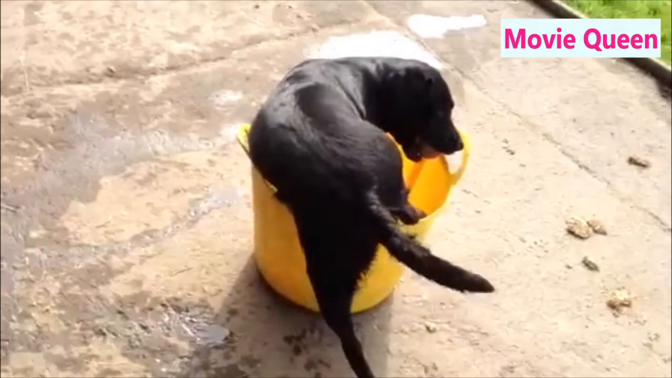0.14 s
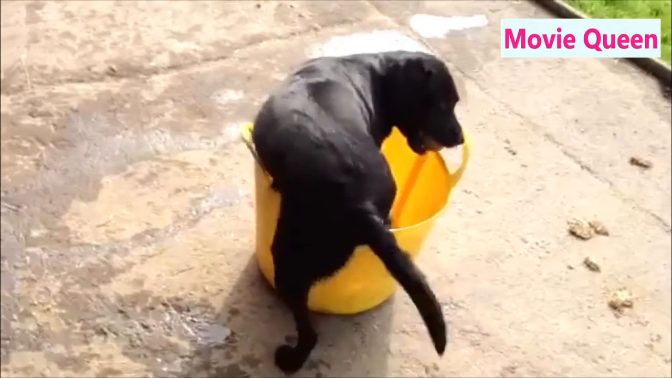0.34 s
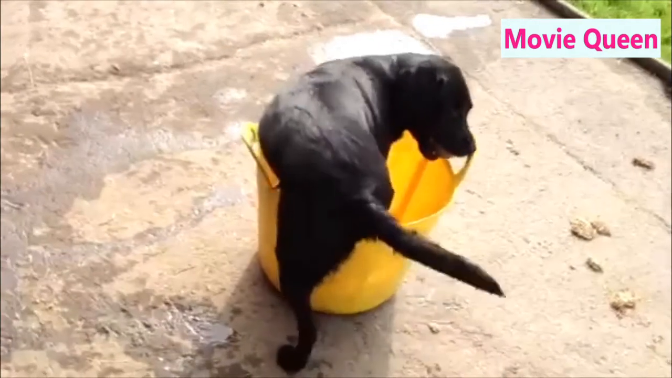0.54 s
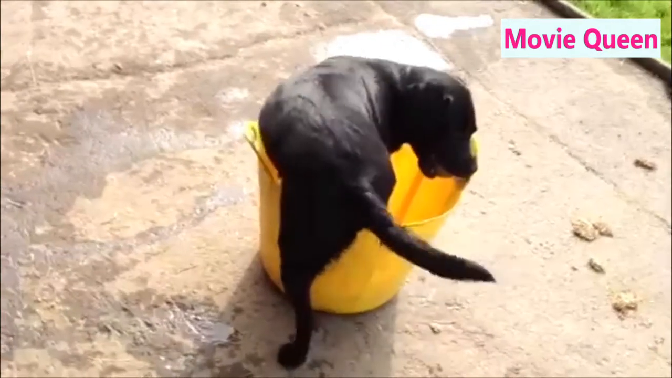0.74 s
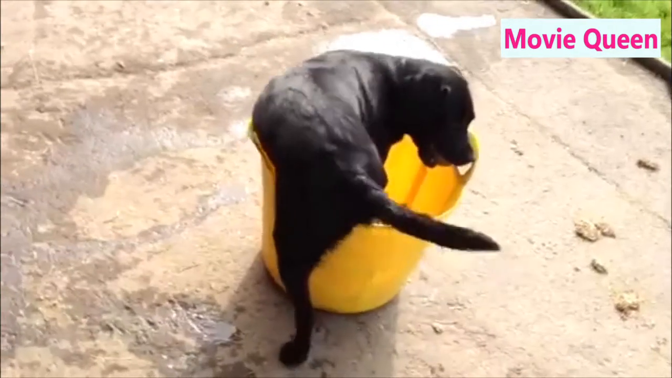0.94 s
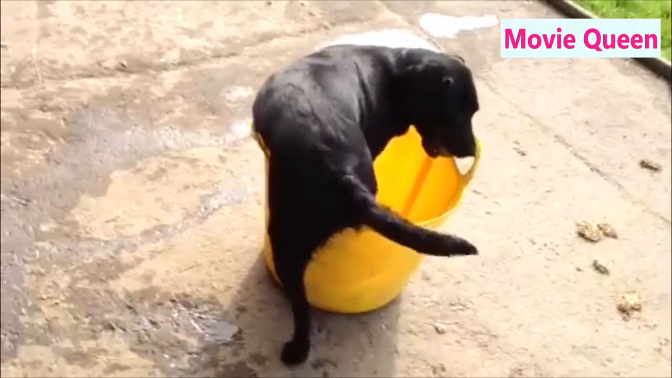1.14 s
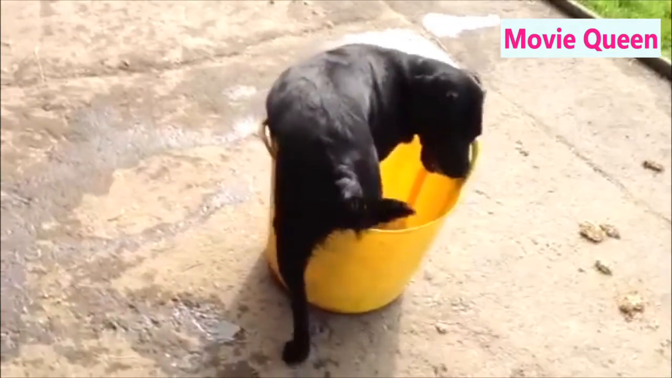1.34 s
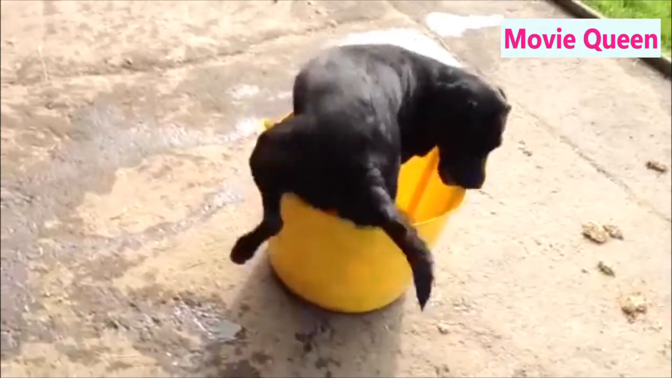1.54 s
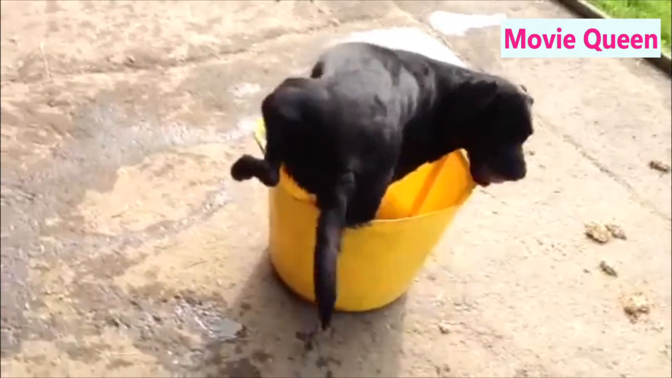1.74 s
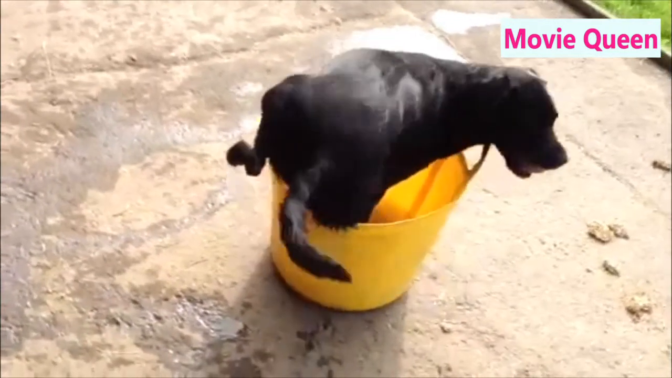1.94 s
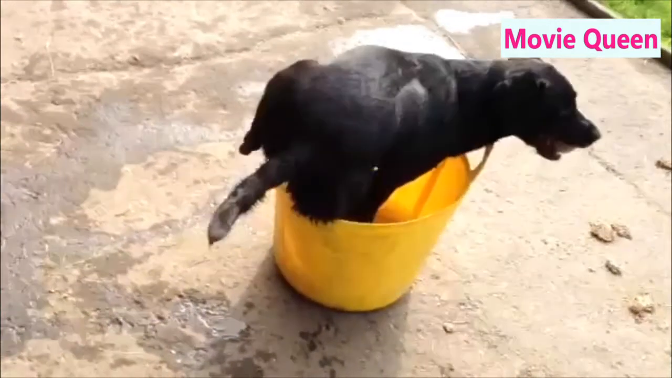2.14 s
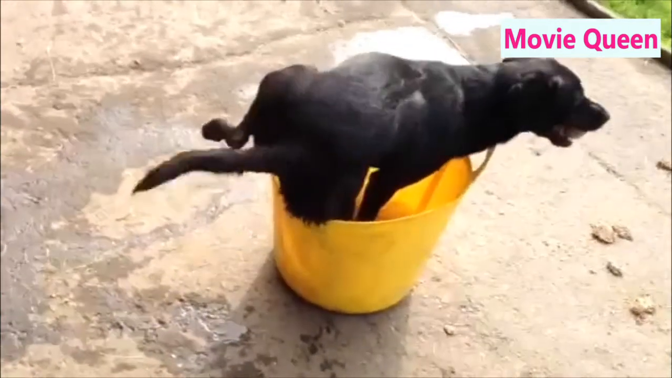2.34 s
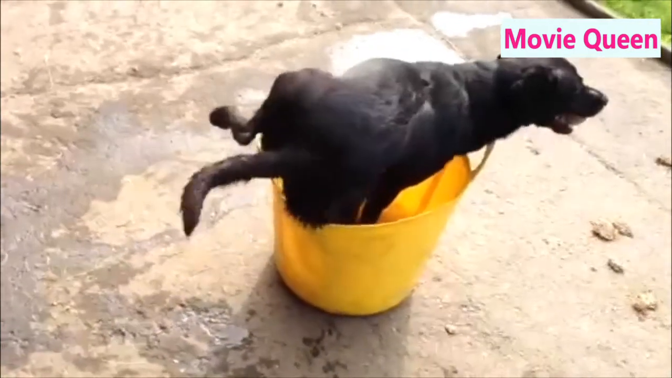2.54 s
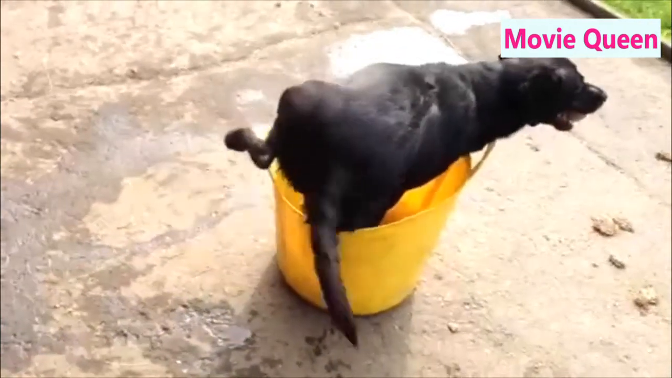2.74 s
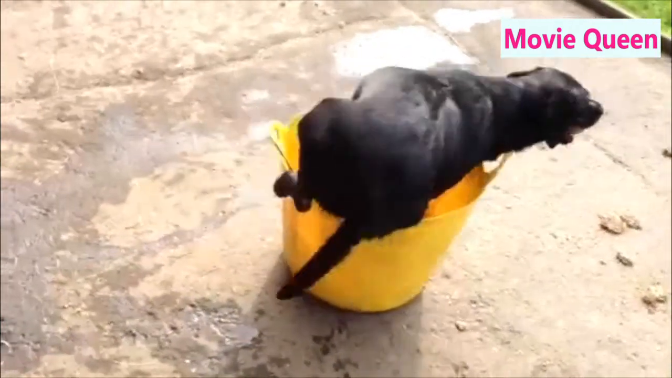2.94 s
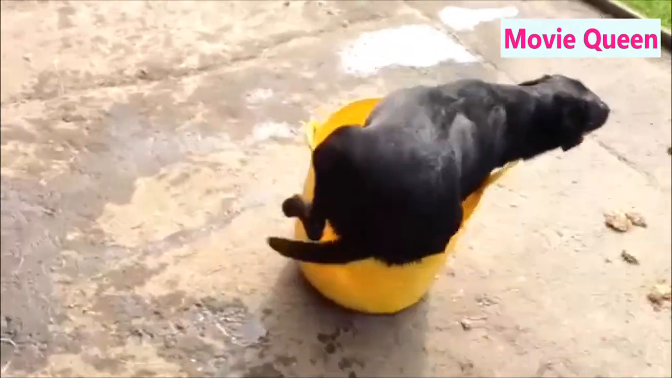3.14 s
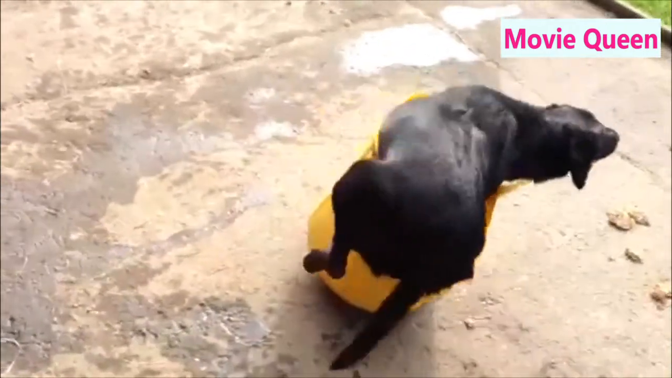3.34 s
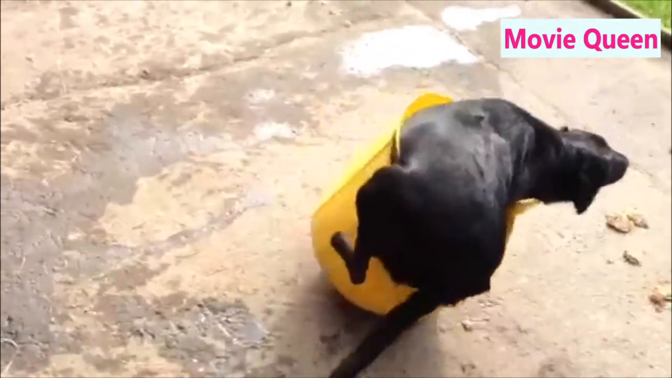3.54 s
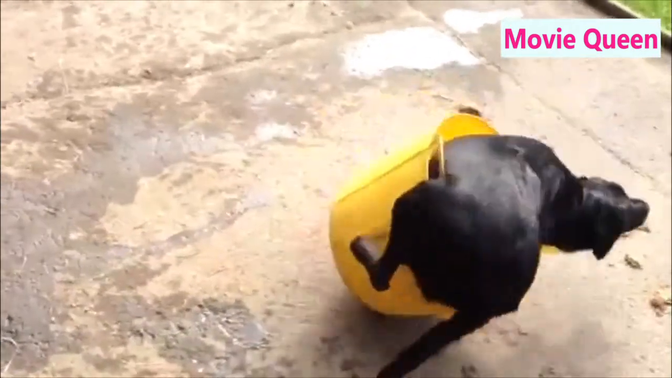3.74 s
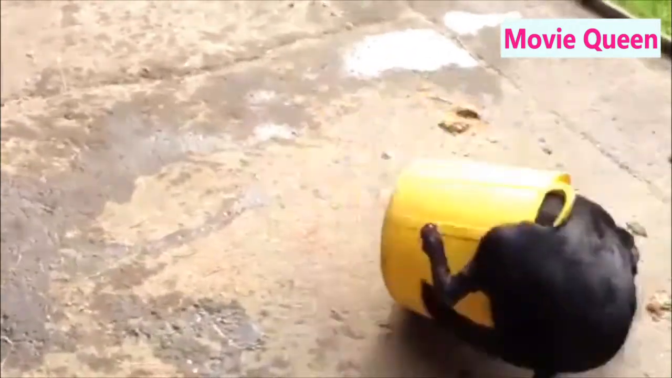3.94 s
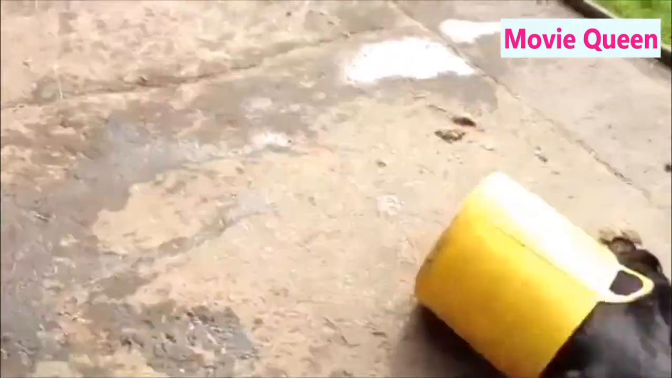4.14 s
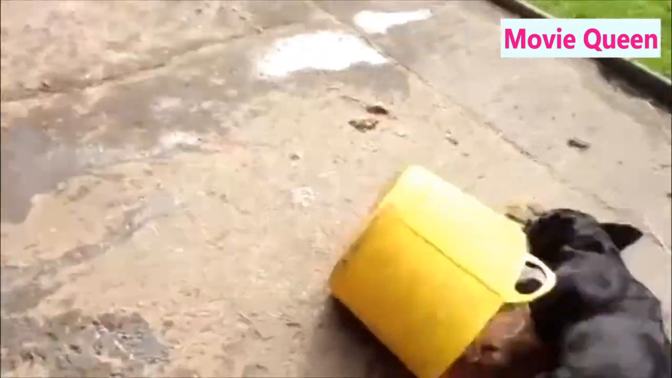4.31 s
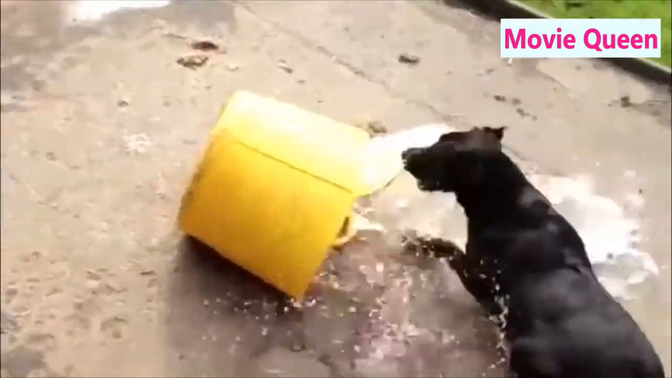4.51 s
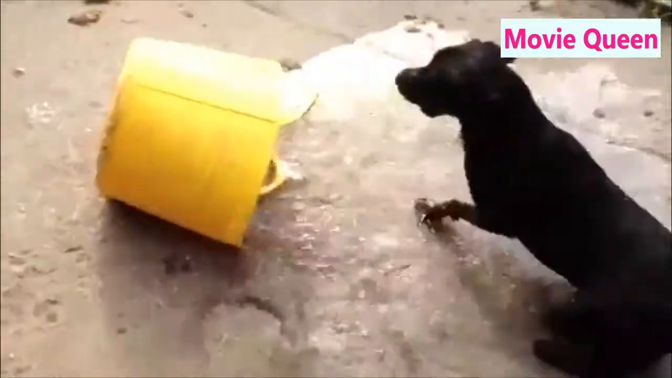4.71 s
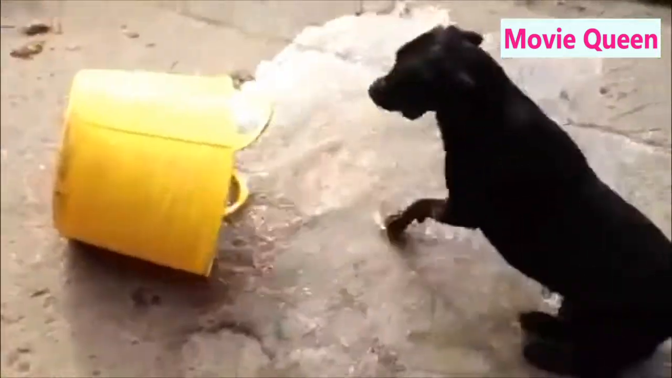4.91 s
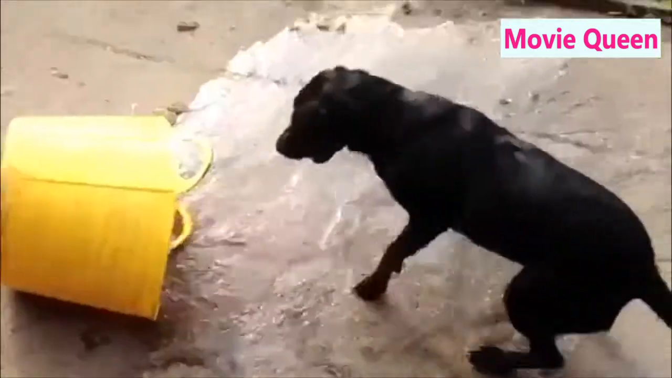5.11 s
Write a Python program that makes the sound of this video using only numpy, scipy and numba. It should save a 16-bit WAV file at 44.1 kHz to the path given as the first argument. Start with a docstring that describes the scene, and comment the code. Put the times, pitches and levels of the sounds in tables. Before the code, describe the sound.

Quiet taps and a brief splash in a soft plastic tub, then near silence over a low traffic murmur and thin insect hiss. Around three seconds the tub bumps and sloshes; at four it falls over with booming plastic blows, skids across concrete and empties in a bubbling rush. Drips thin out before a hard abrupt knock near five seconds. Close, dry outdoor pickup.

```python
"""Over distant traffic and an insect's hiss, dull taps and a ripple lead to a dog's paw entering a tub of water.
The flexible tub knocks and scuffs, drops ring, and a bird calls once; at 3 s the tub wobbles on a concrete yard.
At about 4.1 s it tips with the loudest blows, skids and rolls as the water gushes out, and the last drops fall.
Solid sounds are modal rings and resonant noise; water is chirped bubble sines and coloured noise;
the air is noise in bands, the insect a noise band and the bird a falling sine."""
import sys
import numpy as np
from scipy import signal
from scipy.fft import rfft, irfft, next_fast_len
from scipy.io import wavfile
from scipy.ndimage import uniform_filter1d
from numba import njit

SR = 44100
rng = np.random.default_rng(int(sys.argv[2]) if len(sys.argv) > 2 else 0)


def unload_audio(sound):
    """Save the sound as a 16-bit wav file, at the path given as the first command line argument."""
    columns = np.transpose(np.atleast_2d(sound))
    # keep every value between -1 and 1, then stretch to whole-number steps
    steps = np.round(np.clip(columns, -1, 1) * 32767)
    wavfile.write(sys.argv[1], SR, steps.astype(np.int16))


N = 232248
T = np.arange(N) / SR  # time in seconds

# Spectrum of the distant air. Each row: frequency in Hz, relative gain in dB.
AIR_SPECTRUM = [(15, -65), (25, -36), (64, -32), (151, -2), (245, -1), (398, -3.5), (456, -7.5),
                (1020, 1.5), (1570, -10.5), (2480, -11), (3910, -16), (6690, -13.5), (10000, -20),
                (14200, -9.5), (15400, -20)]
# The insect's noise band. One row: centre in Hz, width in Hz, level in dB.
INSECT_BAND = (6680, 90, -77)
# The bird's note. One row: length in seconds, first pitch in Hz, last pitch in Hz, starting level in dB.
BIRD_NOTE = (.15, 4620, 4380, -63)
# Dull dry taps. Each row: start in seconds, peak level in dB.
TAPS = [(0.133, -30.5), (0.38, -29.5), (1.076, -30), (1.251, -36), (1.437, -31.5), (1.603, -37.5),
        (1.677, -34), (2.195, -33), (2.448, -38.5), (2.741, -36.5), (3.479, -29.5), (5.054, -5),
        (5.062, -14), (5.071, -15), (5.087, -17), (5.098, -19)]
# Water on the move: four curves, for a ripple, a paw going in, the tub wobbling and the tub emptying.
# Each row of a curve: time in seconds, slosh level in dB.
WATER_CURVES = [
    [(0.25, -75), (0.29, -62), (0.37, -65.5), (0.4, -68)],
    [(0.72, -82), (0.77, -53), (0.82, -60), (0.87, -46), (0.96, -48), (1.0, -52), (1.06, -60.5), (1.3, -67)],
    [(3.02, -62), (3.055, -51.5), (3.118, -52.5), (3.16, -48.5), (3.25, -46.5), (3.31, -59), (3.385, -50.5),
     (3.41, -46), (3.48, -50.5), (3.52, -63), (3.62, -59), (3.72, -64)],
    [(3.86, -69), (3.945, -52), (4.0, -58.5), (4.06, -58.5), (4.101, -41), (4.135, -47), (4.16, -39.5),
     (4.2, -40.5), (4.27, -32.5), (4.35, -39), (4.41, -35), (4.49, -37.5), (4.53, -31.5), (4.57, -39),
     (4.66, -38.5), (4.82, -46), (4.9, -45.5), (4.97, -51), (5.1, -51.5), (5.19, -60), (5.27, -49.5)],
]
# Spray level relative to the slosh. Each entry, one for each curve above: level in dB.
SPRAY_DB = (1, -6.5, -7.5, -4)
# Colouring of the slosh. Each row: frequency in Hz, relative gain in dB.
SLOSH_SPECTRUM = [(700, -25), (1100, -6), (1500, -5.5), (2000, -3), (2900, -4.5), (3400, -21), (4200, -59)]
# Colouring of the spray. Each row: frequency in Hz, relative gain in dB.
SPRAY_SPECTRUM = [(1940, -12), (3300, -5.5), (3680, -9.5), (4640, -5), (5180, -4), (6580, 0), (8400, -13.5),
                  (10500, -22), (14400, -15.5), (15400, -16)]
# Single drops and bubbles. Each row: start in seconds, peak level in dB, starting pitch in Hz.
DROPS = [(.748, -43, 1100), (0.821, -35.5, 1324), (.905, -27, 1170), (0.918, -30.5, 2740),
         (0.938, -24, 1097), (1.043, -44.5, 2970), (1.054, -47, 2420), (1.104, -44, 2830),
         (1.124, -47, 2465), (1.138, -41.5, 2280), (1.204, -43, 1780), (1.245, -37.5, 1127),
         (2.193, -47, 1730), (3.045, -45, 2080), (3.341, -27.5, 858), (3.419, -28.5, 1315),
         (4.28, -21, 640), (4.315, -24, 622), (4.37, -21, 646), (4.49, -21.5, 1330), (4.605, -27.5, 606),
         (4.738, -31, 2110), (4.779, -31, 1210), (4.815, -21.5, 1214), (4.862, -35, 2450),
         (4.884, -23, 1232), (4.887, -26, 1757), (4.934, -33, 760), (5.022, -28.5, 1002)]
# Paws and body scuffing the tub. Each row: start in seconds, length in seconds,
# belly rumble level in dB, wall scuff level in dB, both before the fade over the stroke.
SCUFFS = [(0.807, 0.19, -52, -42.5), (1.037, 0.064, -52.5, -51), (1.815, 0.089, -73, -50),
          (2.249, 0.086, -65, -50), (2.686, 0.073, -60, -54.5), (3.024, 0.075, -66, -48),
          (3.092, 0.08, -47, -49), (3.208, 0.091, -54.5, -50.5), (3.384, 0.12, -47.5, -45),
          (3.877, 0.046, -44, -47.5), (3.947, 0.15, -41.5, -47), (4.856, 0.17, -55, -44),
          (5.051, 0.096, -35, -34.5), (5.231, 0.044, -55, -41.5)]
# The fallen tub skidding and rolling. Each row: time in seconds, belly rumble in dB, wall scuff in dB.
SKID = [(4.082, -51, -52), (4.101, -19, -36), (4.135, -36.5, -28), (4.16, -20, -23.5), (4.21, -24.5, -34),
        (4.26, -30.5, -30), (4.3, -34.5, -39), (4.42, -37.5, -33.5), (4.49, -44, -35), (4.53, -39, -35),
        (4.58, -47, -40), (4.65, -45, -38.5), (4.76, -66, -54.5), (4.85, -77, -50)]
# Modes of the tub's belly. Each row: frequency in Hz, relative level in dB, t60 in seconds.
BELLY_MODES = [(171.6, -6, 0.22), (201.6, 7.5, 0.083), (259, 2, 0.07), (297, -5.5, 0.098)]
# Modes of the tub's wall. Each row: frequency in Hz, relative level in dB, t60 in seconds.
WALL_MODES = [(415, 1, 0.045), (567, -0.5, 0.058), (651, -8, 0.072), (765, -22.5, 0.24), (892, 1.5, 0.018),
              (1137, -1.5, 0.027), (1247, 2, 0.047), (1519, -13.5, 0.053)]
# Blows on the tub. Each row: start in seconds, peak levels of belly boom, wall knock and crack in dB,
# favoured belly pitch in Hz, favoured wall pitch in Hz.
BLOWS = [(0.862, -34.5, -35, -50, 223, 924), (2.139, -37, -39.5, -61, 220, 401),
         (2.962, -36.5, -34.5, -51, 287, 580), (3.091, -19.5, -28, -26, 210, 1390),
         (3.152, -33.5, -54, -53, 196, 1250), (3.331, -51, -28.5, -55, 280, 883),
         (3.399, -28, -36, -33.5, 148, 404), (3.835, -35, -39, -48.5, 206, 452),
         (3.868, -45, -38.5, -59, 270, 940), (3.963, -23, -19.5, -28.5, 252, 1370),
         (4.01, -31, -51, -61, 186, 409), (4.044, -25, -38, -43.5, 160, 415),
         (4.094, -12, -3, -33, 375, 610), (4.109, -16, -15, -48, 300, 570), (4.148, -8, -22, -56, 167, 498),
         (4.262, -23, -43, -23.5, 196, 651), (4.393, -48, -21.5, -19, 269, 440),
         (4.699, -39.5, -37, -46, 272, 439), (4.868, -36, -34, -49, 355, 1230),
         (5.219, -42, -34.5, -43, 248, 724)]
# Slaps of thrown water, plus at 4.0864 s the crack of a blow on the tub heard without its boom. Each row: start
# in seconds, peak level in dB, t60 in seconds.
SLAPS = [(0.8695, -53, 0.1), (0.9175, -37, 0.069), (0.944, -40, 0.058), (1.04, -47, 0.04),
         (3.172, -36.5, 0.12), (3.224, -37, 0.067), (3.4264, -39, 0.049), (4.0864, -21, 0.031),
         (4.2086, -21, 0.025), (4.2518, -19.5, 0.034), (4.389, -23, 0.066), (4.5235, -22.5, 0.21),
         (4.571, -24, 0.041), (4.7393, -31, 0.031), (4.769, -31.5, 0.15), (4.886, -37, 0.045),
         (4.903, -30, 0.025), (4.964, -38, 0.062), (5.062, -44, 0.044), (5.1397, -36.5, 0.029),
         (5.1584, -39.5, 0.06), (5.219, -42, 0.026)]

AIR_DB = -52.5
BIRD_S = 1.215
DIP_S, DIP_WIDTH_S = .0022, .00049  # first touch to deepest dip; time scale of the dip
DROP_T60_S, DROP_SHORTENS = 0.052, 0.54  # ring at 1 kHz; small bubbles die sooner, as pitch to this power
STROKE_FADE_DB = 4.5  # a scuff weakens this much from start to end
BELLY_FADE_DB = 4.5  # the belly loses this much more than the wall over a stroke
SLAP_HZ, SLAP_SCATTER = 5720, 0.071  # mean pitch; relative spread
BASS_CUT_HZ = 167  # corner of the bass cut on tub and water sounds
TOP_HZ = 15150


def undb(db):
    """Convert a level in decibels to an amplitude ratio."""
    return 10 ** (np.asarray(db) / 20)


def unit(x):
    """Normalise a signal to a root-mean-square amplitude of 1."""
    return x / np.sqrt(np.mean(x ** 2))


def colour(x, points):
    """Spectral shaping: multiply the spectrum by gains interpolated over log frequency."""
    hz, db = np.transpose(points)
    size = next_fast_len(N)
    f = np.maximum(np.arange(size // 2 + 1) * SR / size, 1)
    gains = undb(np.interp(np.log(f), np.log(hz), db))
    return irfft(rfft(x, size) * gains, size)[:N]


def band(x, hz, width_hz):
    """Simple resonance: a two-pole filter."""
    return signal.lfilter(*signal.iirpeak(hz, hz / width_hz, SR), x)


def steep(x, hz, width_hz):
    """Cascaded resonance: the same filter twice gives steeper skirts."""
    return band(band(x, hz, width_hz), hz, width_hz)


def highpass(x, order, hz):
    """High-pass response: attenuation below the corner frequency."""
    return signal.sosfilt(signal.butter(order, hz, "high", fs=SR, output="sos"), x)


def noise(count=N):
    """White noise: independent Gaussian samples."""
    return rng.standard_normal(count)


def walk(rate):
    """Slow random fluctuation of unit spread: random steps, rate per second, smoothed twice."""
    k = int(SR / rate)
    steps = np.repeat(noise(N // k + 1), k)
    return unit(uniform_filter1d(uniform_filter1d(steps, k), k)[:N])


def gain(curve, column=1):
    """Amplitude envelope: interpolate in decibels over time, practically silent outside the curve."""
    curve = np.transpose(curve)
    return undb(np.interp(T, curve[0], curve[column], left=-200, right=-200))


def add(out, s, sound, db):
    """Superposition: mix a sound in at its peak level."""
    i = int(s * SR)
    sound = sound[:N - i]
    out[i:i + len(sound)] += sound * undb(db) / np.abs(sound).max()


@njit
def grains(start, hz, cycles, size, glide, count):
    """Bubble resonance: fading sines whose pitch rises as the bubble nears the surface."""
    out = np.zeros(count)
    for k in range(len(start)):
        span = cycles[k] * SR / hz[k]
        phase = 0.
        for j in range(min(int(3 * span), count - start[k])):
            phase += 2 * np.pi * hz[k] * (1 + glide * j / span) / SR
            out[start[k] + j] += size[k] * np.exp(-2 * j / span) * np.sin(phase)
    return out


def swarm(count, lo_hz, hi_hz, cycles, spread_db, glide):
    """Statistical superposition: many grains at random times, pitches and sizes."""
    when, pitch, strength, duration = rng.random((count, 4)).T
    hz = lo_hz * (hi_hz / lo_hz) ** pitch
    excess = np.minimum(-np.log(1 - strength), 3.5)  # exponential, with a ceiling
    size = undb(spread_db * excess) * np.sqrt(hz / cycles)
    return unit(grains((when * N).astype(np.int64), hz, cycles * (.5 + duration), size, glide, N))


def distant_air():
    """Band-wise fluctuation: distant traffic and air as noise bands that flicker alone over one swell."""
    swell = walk(1.39)
    air = np.zeros(N)
    for hz in 30 * 2. ** np.arange(0, 9.1, .75):
        flicker = undb(0.26 * swell + 1.9 * walk(15))
        air += np.sqrt(1 / hz) * band(noise(), hz, hz / 2) * flicker
    return unit(colour(air, AIR_SPECTRUM)) * undb(AIR_DB)


def insect():
    """Narrow-band noise: a thin hiss whose level wavers slowly."""
    hz, width_hz, db = INSECT_BAND
    return unit(band(noise(), hz, width_hz)) * undb(db + 1.8 * walk(2.6))


def taps():
    """Impulsive pressure: a dip between two small rises, then a short hollow ring."""
    out = np.zeros(N)
    u = (T[:2000] - DIP_S) / DIP_WIDTH_S
    dip = (1.61 * u ** 2 - 1) * np.exp(-u ** 2)
    hollow = 4.7 * band(dip, 220, 94) + 0.58 * band(dip, 620, 430)
    for s, db in TAPS:
        add(out, s, dip + hollow, db)
    return highpass(out, 1, 70)


def moving_water():
    """Bubble ensembles: slosh and finer spray, each over a hiss, surge together in clumps."""
    clumps = undb(1.9 * walk(60))
    slosh = swarm(count=6500, lo_hz=1141.0, hi_hz=3530.0, cycles=14.6, spread_db=3.5, glide=0.04)
    slosh = colour(slosh + 1.1 * noise(), SLOSH_SPECTRUM)
    spray = swarm(count=9000, lo_hz=2800.0, hi_hz=14640.0, cycles=11.0, spread_db=4.5, glide=0.02)
    spray = colour(spray + 1.37 * noise(), SPRAY_SPECTRUM)
    flow = [gain(curve) for curve in WATER_CURVES]
    mist = sum(undb(db) * f for db, f in zip(SPRAY_DB, flow))
    return unit(slosh * clumps) * sum(flow) + unit(spray * clumps) * mist


def drops():
    """Single-bubble resonance: each swells, flutters, rises slightly in pitch and dies."""
    out, t = np.zeros(N), T[:6000]
    for s, db, hz in DROPS:
        t60 = DROP_T60_S * (1000 / hz) ** DROP_SHORTENS
        flutter = 1 + 0.52 * unit(band(noise(len(t)), 85, 127))
        fade = undb(-60 * t / t60) * (1 - np.exp(-t / t60 * 25)) ** 2
        tone = np.sin(2 * np.pi * hz * t * (1 + 0.56 * t))
        add(out, s, tone * flutter * fade, db)
    return out


def rubbed(modes):
    """Frictional excitation: unsteady noise drives each mode, wider where its ring is shorter."""
    bands = (undb(db) * steep(noise() * undb(4. * walk(45)), hz, 14 / t60) for hz, db, t60 in modes)
    return unit(sum(bands))


def scuffs():
    """Friction: strokes and skidding shake belly and wall, with bubbles gurgling in the wall sound."""
    rumble = rubbed(BELLY_MODES)
    bubbles = swarm(count=2500, lo_hz=470.0, hi_hz=1302.0, cycles=7.4, spread_db=4.0, glide=0.039)
    gurgle = unit(rubbed(WALL_MODES) + 0.56 * bubbles)
    belly, wall = gain(SKID, column=1), gain(SKID, column=2)
    for s, length, belly_db, wall_db in SCUFFS:
        u = (T - s) / length
        progress = np.clip(u - .5, -1, 1)
        stroke = np.exp(-(u * 2 - 1) ** 4) * undb(-STROKE_FADE_DB * progress)
        belly = belly + undb(belly_db - BELLY_FADE_DB * progress) * stroke
        wall = wall + undb(wall_db) * stroke
    return rumble * belly + gurgle * wall


def ring(modes, rise_ms, scatter_db):
    """Modal decay: modes a little off their usual pitch and strength swell over the contact and fade."""
    t = T[:SR // 4]
    rings = np.zeros(len(t))
    for hz, db, t60 in modes:
        strength, detune, phase = noise(3)
        fade = undb(db + scatter_db * strength - 60 * t / t60)
        rings += fade * np.sin(2 * np.pi * hz * (1 + 0.023 * detune) * t + 0.91 * phase)
    return rings * (1 - np.exp(-t * 1000 / rise_ms))


def blows():
    """Modal excitation by impact: where the tub is squashed decides which modes lead; a crack adds noise."""
    out, t = np.zeros(N), T[:2000]
    for s, belly_db, wall_db, crack_db, belly_hz, wall_hz in BLOWS:
        belly = ring(BELLY_MODES, rise_ms=1.6, scatter_db=1.46)
        add(out, s, band(belly, belly_hz, 67), belly_db)
        wall = ring(WALL_MODES, rise_ms=0.37, scatter_db=1.94)
        add(out, s, wall + 1.3 * band(wall, wall_hz, 270), wall_db)
        hiss = noise(len(t))
        crack = steep(hiss, 2370, 1530) + 0.43 * steep(hiss, 4350, 2600)
        add(out, s, crack * undb(-60 * t / 0.063), crack_db)
    return out


def slaps():
    """Decaying broadband noise: bursts of fine spray, and one dry crack of a blow, each around a pitch of its
    own."""
    out, t = np.zeros(N), T[:6000]
    for s, db, t60 in SLAPS:
        hz = SLAP_HZ * (1 + SLAP_SCATTER * rng.standard_normal())
        hiss = noise(len(t))
        burst = steep(hiss, hz, 1700) + 1.06 * steep(hiss, 2370, 1100) + 0.09 * steep(hiss, 11600, 5500)
        add(out, s, burst * undb(-60 * t / t60) * (1 - np.exp(-t / 0.00045)), db)
    return out


def bird():
    """Frequency glide: one falling sine note, weakening and trembling in level."""
    length, from_hz, to_hz, db = BIRD_NOTE
    u = np.clip((T - BIRD_S) / length, 0, 1)
    phase = 2 * np.pi * np.cumsum(from_hz + (to_hz - from_hz) * u) / SR
    level = undb(db - 16 * u + 4 * walk(200)) * np.sin(np.pi * u) ** .3
    return np.sin(phase) * level


def scene():
    """Superposition: tub and water, with their deep bass filtered out, join taps and background."""
    tub_and_water = moving_water() + drops() + scuffs() + blows() + slaps()
    return (distant_air() + insect() + taps() + highpass(tub_and_water, 2, BASS_CUT_HZ) + bird())[None]


def record(dry):
    """Band limitation: a steep low-pass cuts the top of the spectrum."""
    return signal.sosfilt(signal.ellip(9, .2, 70, TOP_HZ, fs=SR, output="sos"), dry)


dry = scene()
out = record(dry)
unload_audio(out)
```